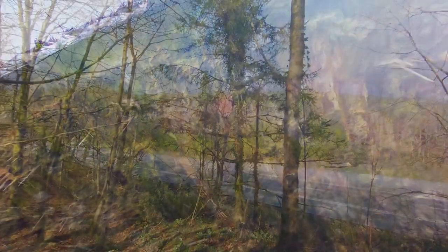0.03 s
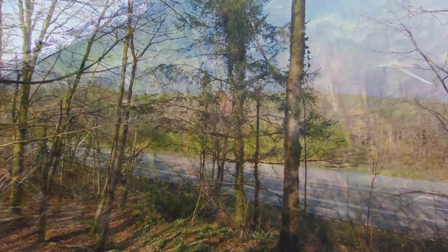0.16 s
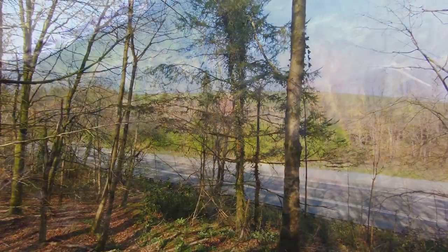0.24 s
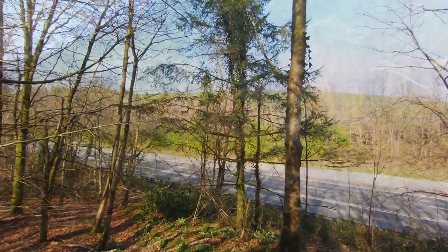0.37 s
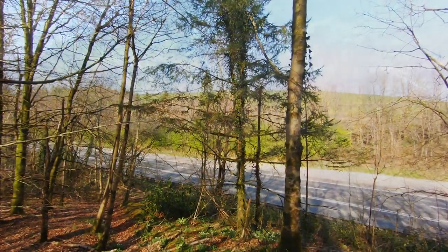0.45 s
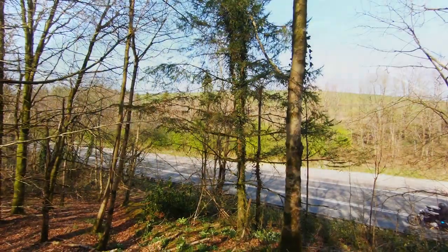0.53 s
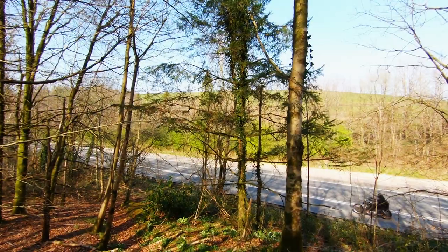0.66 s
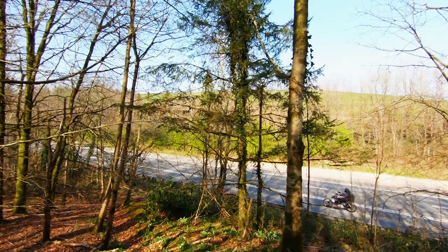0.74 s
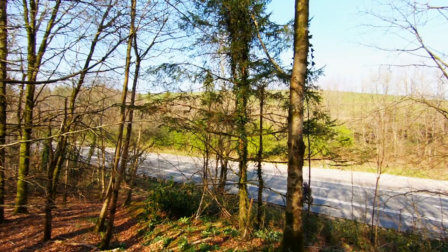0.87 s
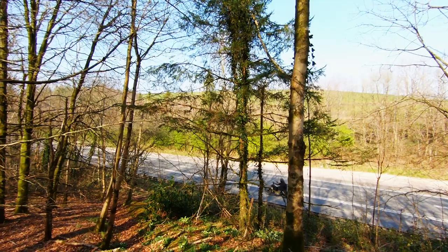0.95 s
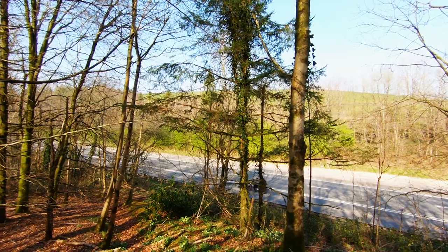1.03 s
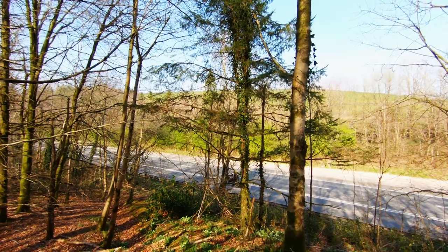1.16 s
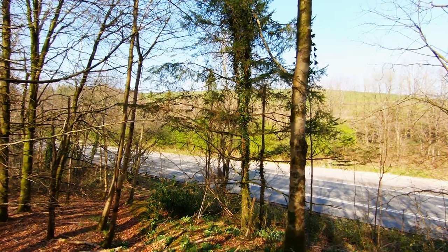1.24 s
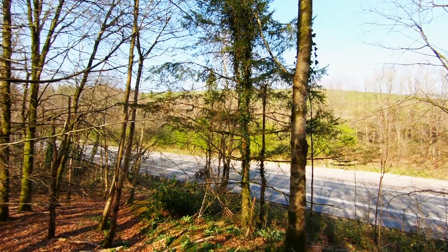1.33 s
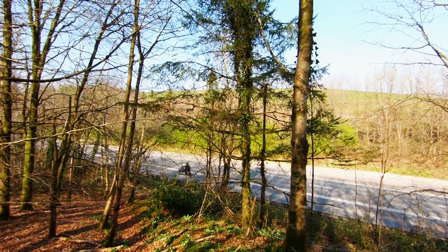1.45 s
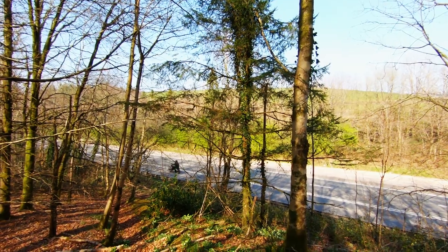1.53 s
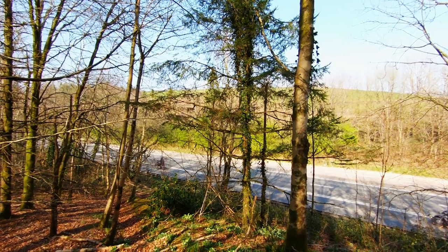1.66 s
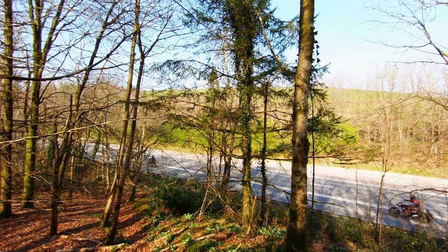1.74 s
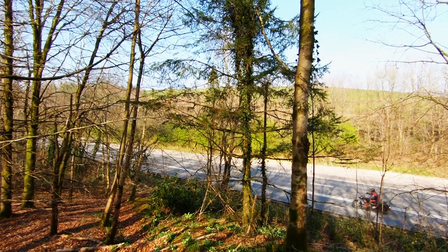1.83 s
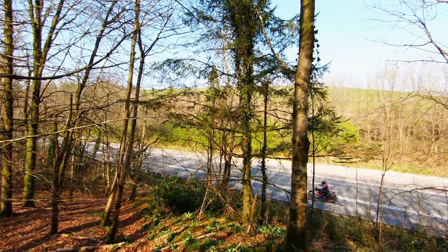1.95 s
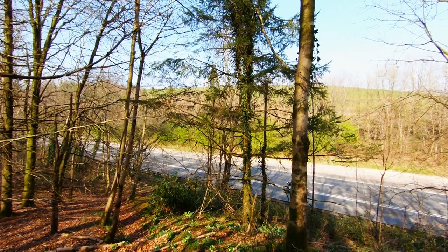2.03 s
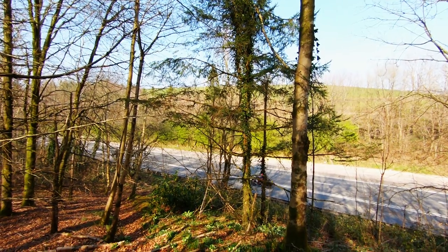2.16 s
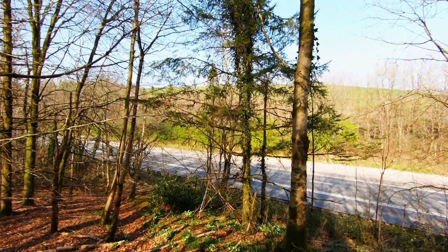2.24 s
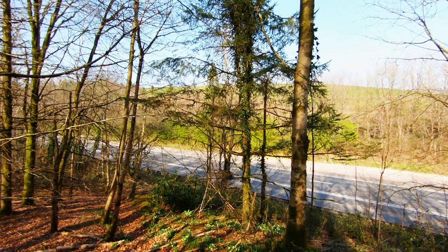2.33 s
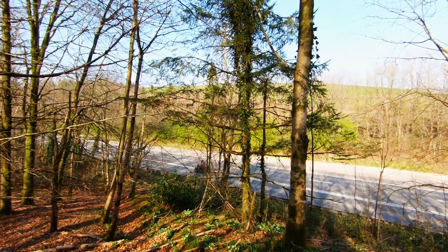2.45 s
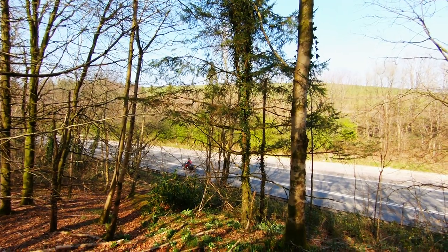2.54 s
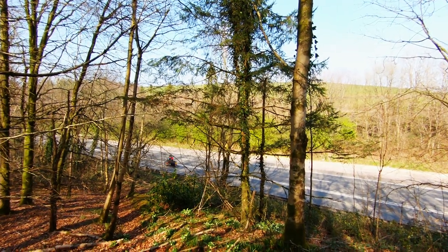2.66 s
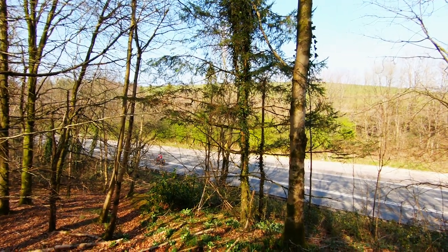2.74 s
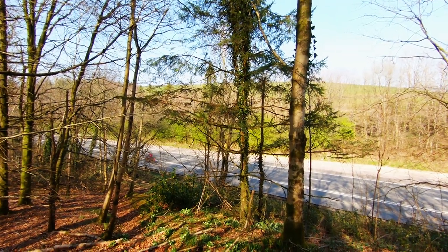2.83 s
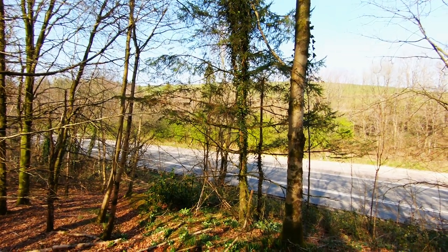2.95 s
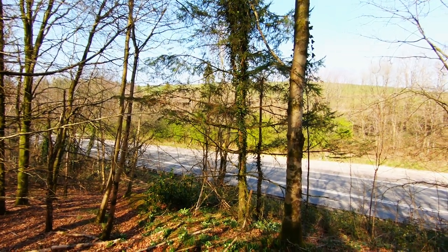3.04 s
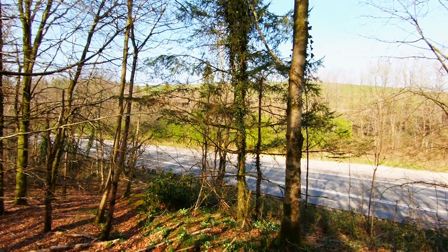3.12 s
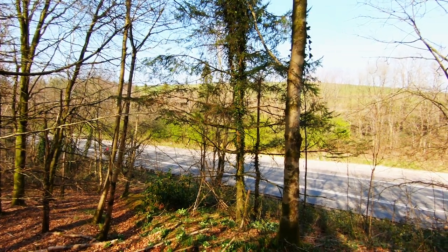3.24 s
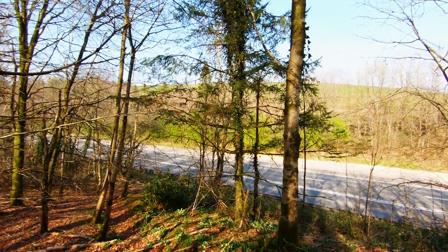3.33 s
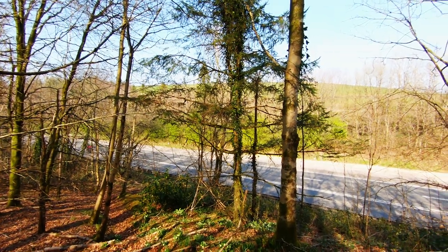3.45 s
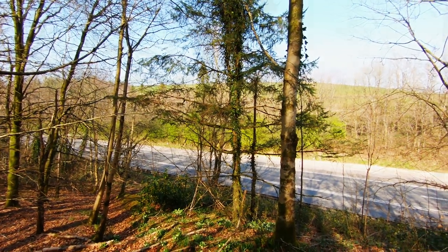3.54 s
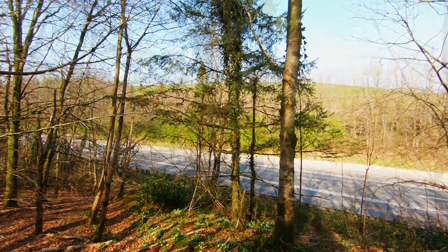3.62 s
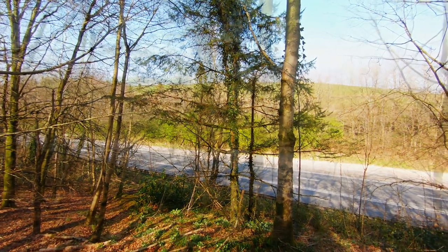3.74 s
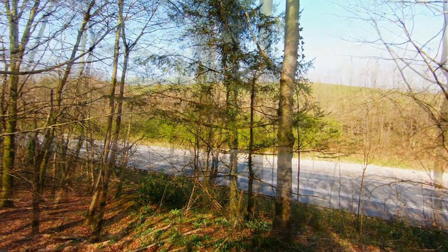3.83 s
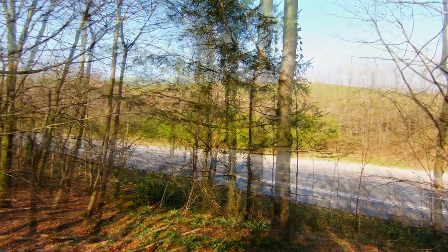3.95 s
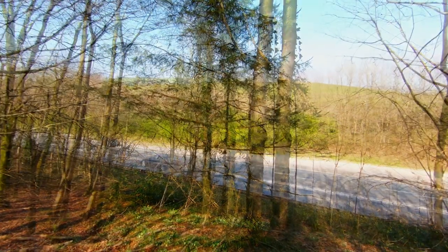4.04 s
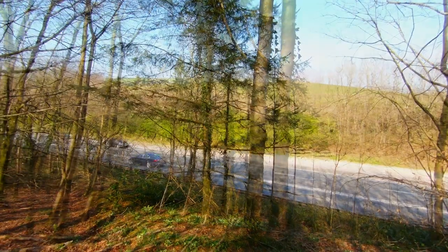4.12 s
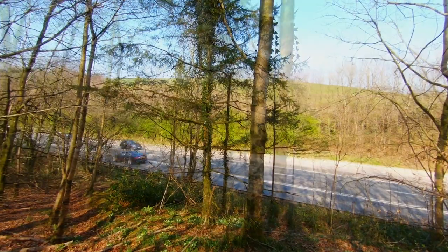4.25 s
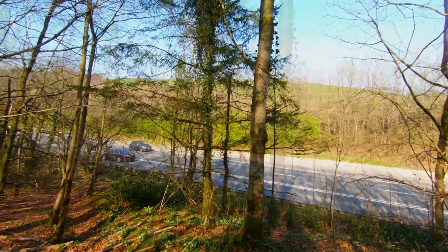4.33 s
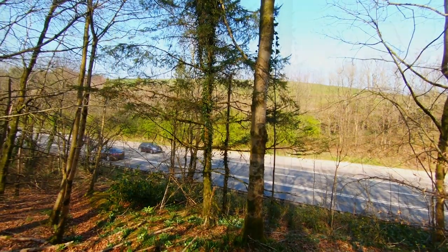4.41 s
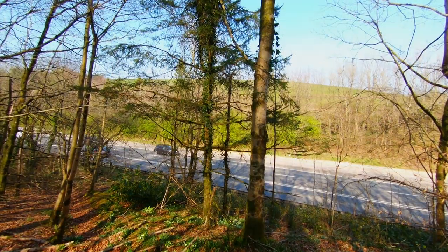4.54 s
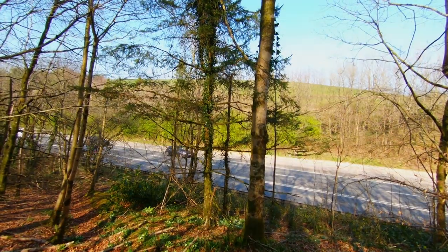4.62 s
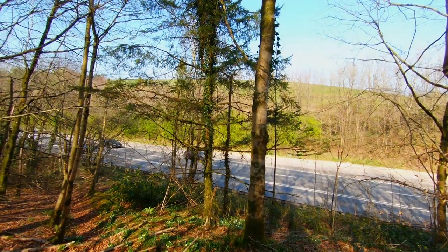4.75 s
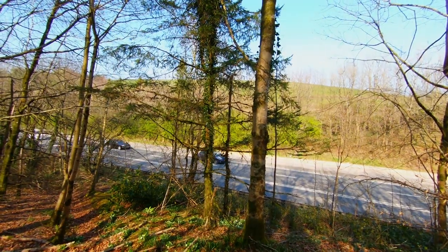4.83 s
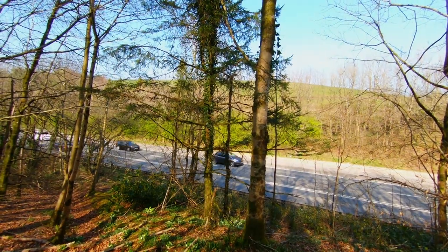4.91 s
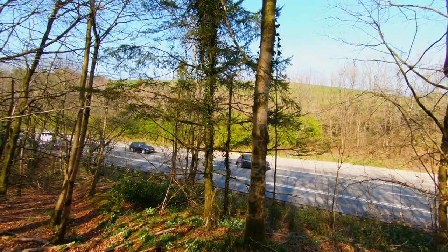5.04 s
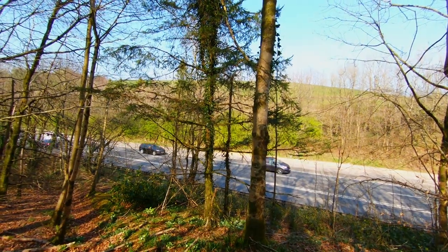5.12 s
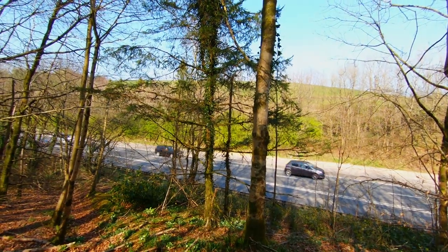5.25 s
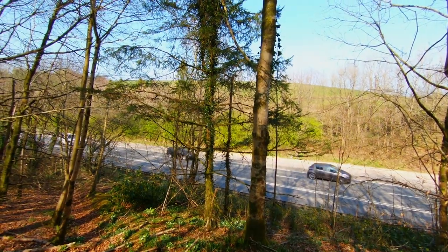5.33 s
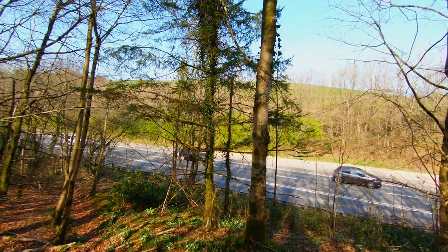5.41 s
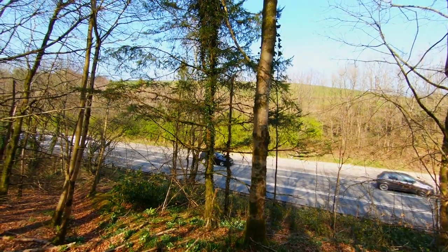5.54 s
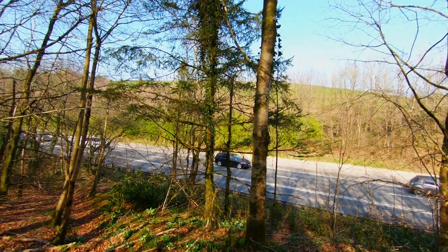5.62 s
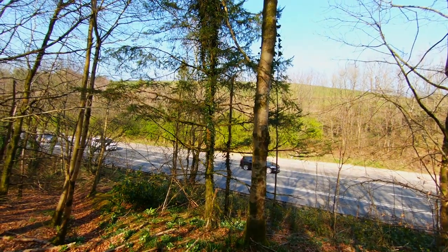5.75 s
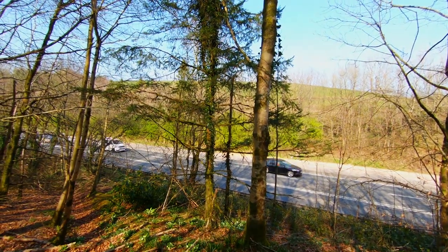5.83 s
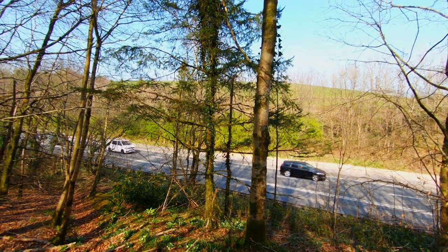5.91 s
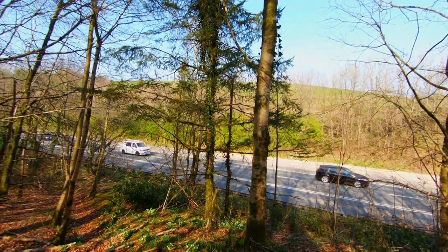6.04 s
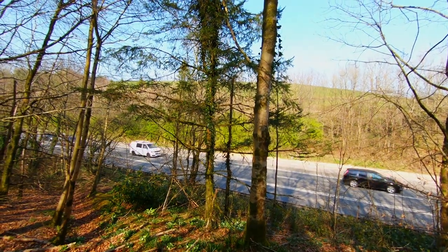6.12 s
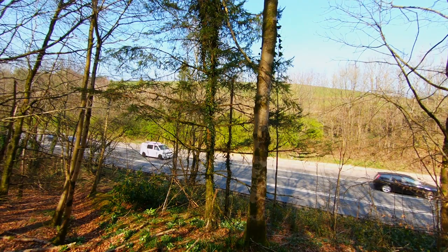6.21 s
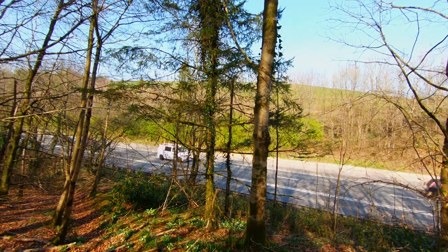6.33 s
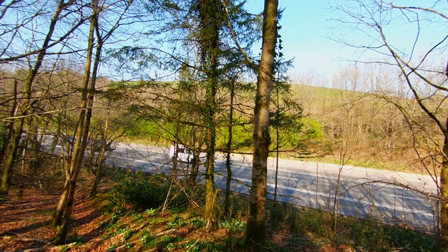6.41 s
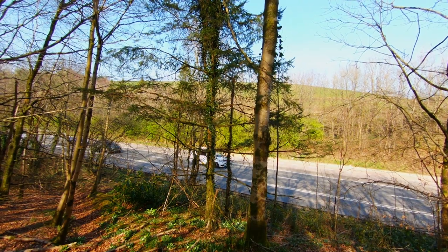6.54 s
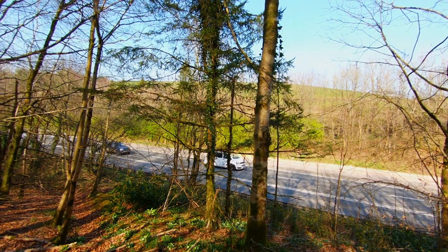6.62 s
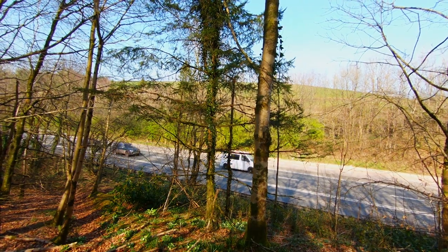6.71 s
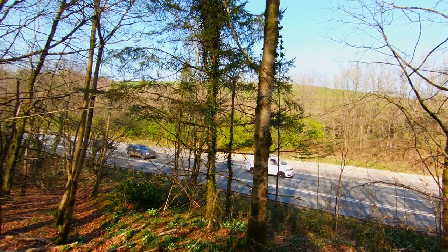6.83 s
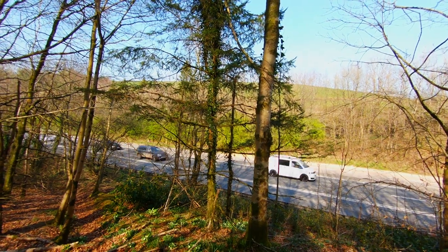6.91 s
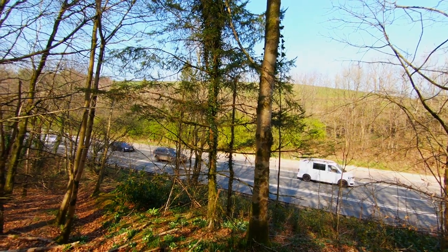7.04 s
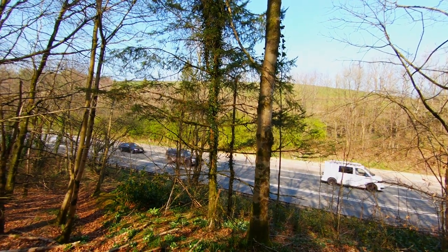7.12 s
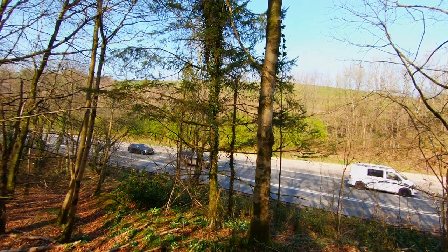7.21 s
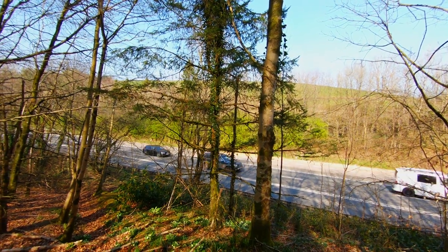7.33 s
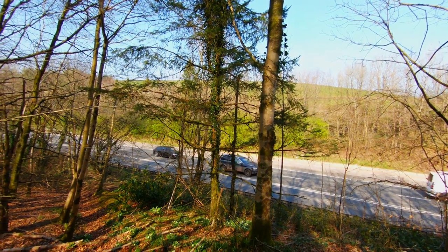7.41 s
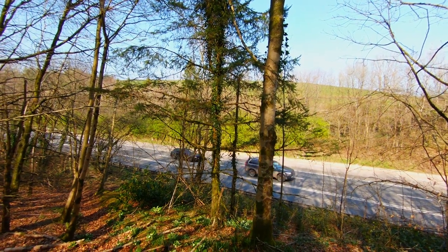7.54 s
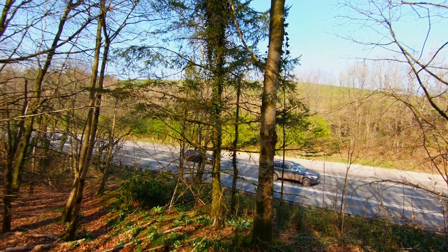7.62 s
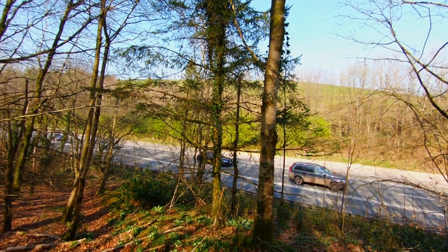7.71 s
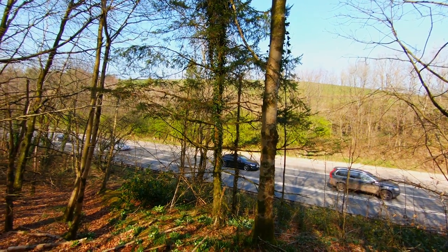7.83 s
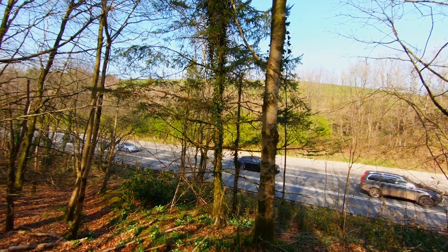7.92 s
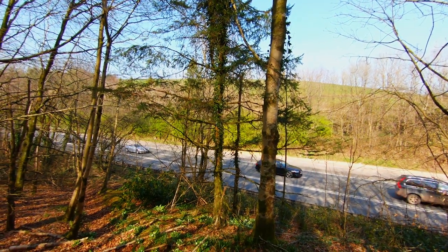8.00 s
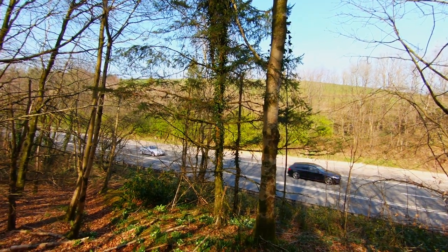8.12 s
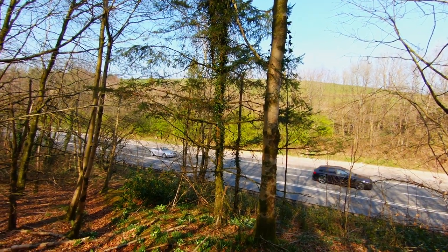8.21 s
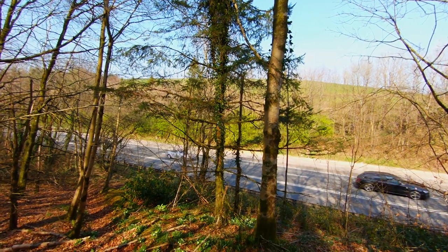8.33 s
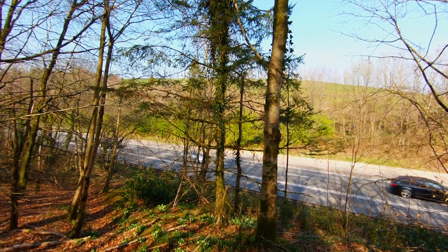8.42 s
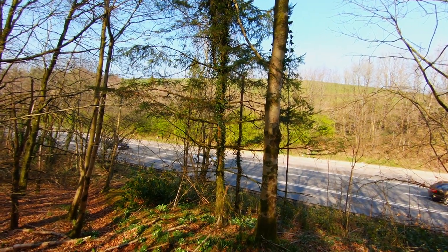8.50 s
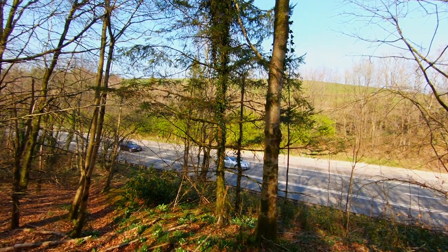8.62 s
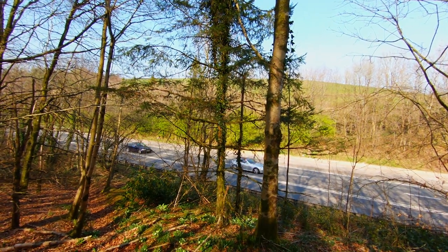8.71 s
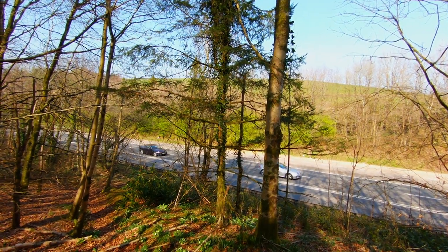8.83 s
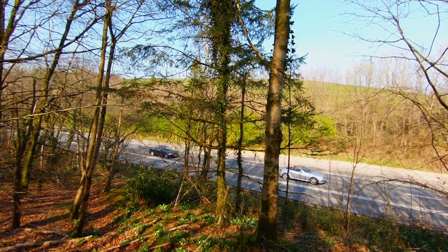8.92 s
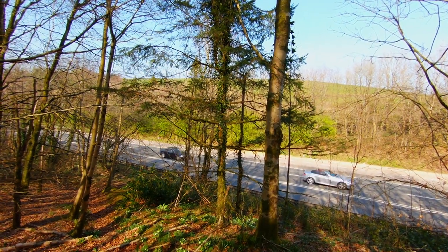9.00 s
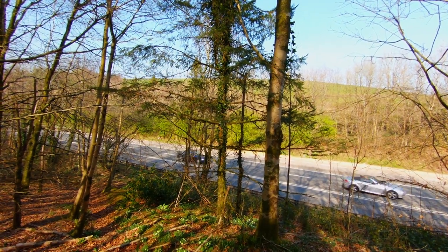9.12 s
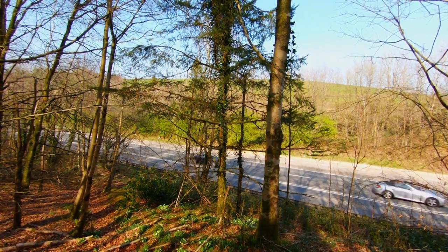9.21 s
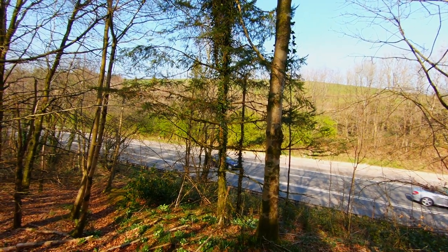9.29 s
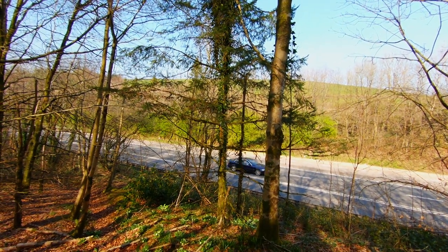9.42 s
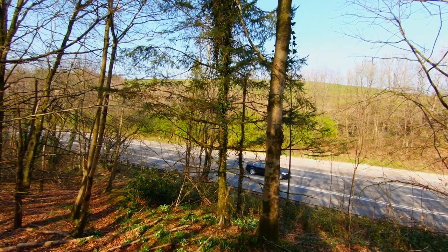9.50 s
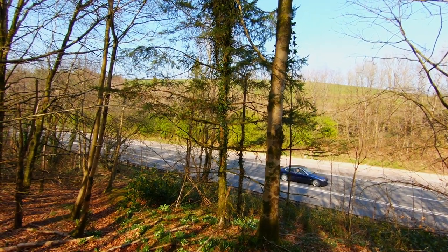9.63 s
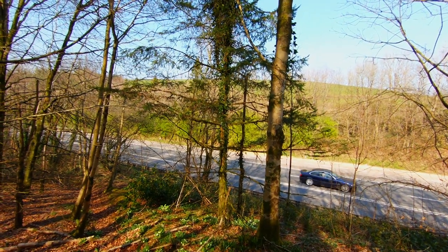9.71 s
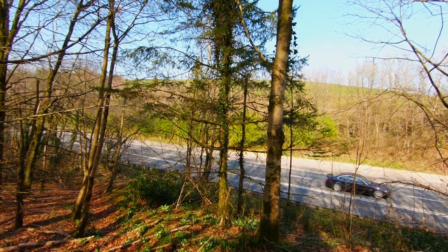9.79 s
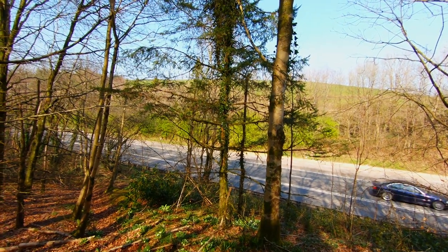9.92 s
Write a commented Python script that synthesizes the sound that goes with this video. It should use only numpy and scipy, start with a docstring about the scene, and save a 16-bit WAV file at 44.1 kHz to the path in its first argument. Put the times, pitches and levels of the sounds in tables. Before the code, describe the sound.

Heard from a wooded bank beside a main road: sound fades in on a lumpy, low motorcycle with a short bark and valve ticking, then a second, smoother and louder one passes and drops in pitch as it recedes. A faint click, then a stream of cars swells by with tyre roar, rumble and humming engines, the last hum strongest.

```python
"""Motorcycles and cars past a wooded bank

Two motorcycles pass one after the other; their exhausts, sums of overtones on a gliding firing rate, sink
and beat as they ride away, with coloured noise for intake rasp, chain and tyres. A faint click comes as they
give way to a line of cars: pitch-bent noise roars, narrow bands sing over a low rumble, and single engine
tones hum through, the last one loudest. Air hisses faintly in the trees; later there is a small dry snap."""
import sys
import numpy as np
from scipy import signal
from scipy.fft import rfft, irfft, next_fast_len
from scipy.io import wavfile
from scipy.ndimage import uniform_filter1d, map_coordinates

SR = 44100
rng = np.random.default_rng(int(sys.argv[2]) if len(sys.argv) > 2 else 0)


def wav_out(sig):
    """Save sig, one row per channel (or a flat mono array), as 16-bit PCM at SR to the path in sys.argv[1]."""
    wavfile.write(sys.argv[1], SR, np.round(np.clip(np.atleast_2d(sig).T, -1, 1) * 32767).astype(np.int16))


N = 439236
TIME = np.arange(N) / SR
TWIN_HZ = 23.554  # engine cycles per second of the first motorcycle, an uneven-firing twin


def amp(db):
    """Decibels to gain."""
    return 10 ** (np.asarray(db) / 20)


def unit(x):
    """Scale to rms 1."""
    return x / np.sqrt(np.mean(x ** 2) + 1e-20)


def curves(rows):
    """One value per sample for each column after the time."""
    s, *columns = np.transpose(rows)
    return [np.interp(TIME, s, column) for column in columns]


def ramp(start, end):
    """Rises from 0 to 1 between two times."""
    return np.clip((TIME - start) / max(end - start, 1e-3), 0, 1)


def wobble(rate):
    """A smooth random curve, rate knots a second."""
    knots = rng.standard_normal(int(N * rate / SR) + 4)
    coarse = TIME[::64]
    return np.interp(TIME, coarse, map_coordinates(knots, [coarse * rate]))


def filtered(x, response):
    """x times a response of frequency."""
    m = next_fast_len(N + SR // 2)
    return irfft(rfft(x, m) * response(np.fft.rfftfreq(m, 1 / SR)), m)[:N]


def noise(spectrum, patchy_db):
    """Noise of rms 1 with a (f/Hz, level/dB) colour and a level patchy over time and frequency."""
    z = signal.stft(rng.standard_normal(N), nperseg=1024)[2]
    field = uniform_filter1d(rng.standard_normal(z.shape), size=7, axis=0)  # smooth over frequency
    field = uniform_filter1d(field, size=10, axis=1)  # and over time
    patchy = signal.istft(z * amp(patchy_db * unit(field)), nperseg=1024)[1][:N]
    hz, db = np.transpose(spectrum)

    def colour(f):
        return amp(np.interp(np.log(f + 1), np.log(hz), db, left=-120, right=-120))

    return unit(filtered(patchy, colour))


def turning(hz):
    """Phase angle of something that turns at a changing rate."""
    return 2 * np.pi * np.cumsum(hz) / SR


def passing(closest_s, level_db, near_s):
    """Gain of vehicles going by: power falls with distance squared, to half at near_s from the closest moment."""
    coarse = TIME[::64]
    away = (coarse - np.reshape(closest_s, (-1, 1))) / near_s
    power = amp(np.reshape(level_db, (-1, 1))) ** 2 / (1 + away ** 2)
    return np.interp(TIME, coarse, np.sqrt(power.sum(axis=0)))


def swell(loudest_s, hz, peak_db, rise_s, fall_s, glide):
    """Pitch and level of a sound that glides steadily, 10 dB down at rise_s before and fall_s after its peak."""
    t = TIME - loudest_s
    away = np.maximum(-t / rise_s, t / fall_s)
    # exponent 1 = a pointed swell, 2 = a rounded one
    return hz + glide * t, peak_db - 10 * np.abs(away) ** 1.5


def narrow_band(hz, level_db, width_hz):
    """A narrow band of noise, slow noise on a carrier, whose centre follows hz."""
    def narrow(f):
        return np.exp(-(f / width_hz) ** 2)

    flutter, drift = (filtered(white, narrow) for white in rng.standard_normal((2, N)))
    angle = turning(hz)
    return amp(level_db) * unit(flutter * np.cos(angle) + drift * np.sin(angle))


def woods():
    """A faint steady hiss of air in the trees."""
    # colour of the hiss: f/Hz, relative level/dB
    air = [(400, -1.5), (1500, -3.5), (3000, -4), (4200, -9.5), (5200, -10), (6000, -28), (8000, -27),
           (11000, -55)]
    return amp(-56.0 + .8 * wobble(2.9)) * noise(air, patchy_db=1.5)


def motorcycles():
    """Two motorcycles; the twin holds its revs, so only the Doppler shift lowers its note."""
    # the second motorcycle eases off as it goes by: t/s, firing rate f/Hz
    tourer_revs = [(0, 64.87), (1.2, 64.9), (1.7, 62.91), (2.3, 59.78), (2.7, 58.31), (3, 56.13),
                   (3.25, 57.1), (3.85, 56.08)]
    shift, drop_at_s, drop_s = .0704, .75, .7378  # Doppler share, middle and time scale of its drop
    away = (TIME - drop_at_s) / drop_s
    twin_hz = TWIN_HZ * (1 - shift * away / np.hypot(1, away))
    tourer_hz, = curves(tourer_revs)
    return bike_exhausts(twin_hz, tourer_hz) + bike_noise(twin_hz, tourer_hz)


def bike_exhausts(twin_hz, tourer_hz):
    """Each exhaust swells as it goes by; echoes off the valley side put a floor under its level."""
    # twin: multiple of the cycle, then relative level/dB coming, going past, far off
    twin_orders = [(2, -2, -7, -12), (3, -10, -7, -7), (4, 3, -4, -14), (5, -.5, .5, -2), (6, 0, -18, -17),
                   (7, -4.5, -14, -30), (8, -14, -13, -14.5), (9, -9, -9.5, -24), (10, -28, -17, -16),
                   (11, -3.5, -24, -29), (12, -19, -12, -11), (13, -9, -36, -12), (14, -23, -19, -13.5)]
    # tourer: multiple of the firing rate, then relative level/dB coming, going past, leaving,
    # throttle shut, far off
    tourer_orders = [(1, -6, -6, -7, -13, -16), (2, 0, 0, 0, 0, 0), (3, -10, -11.5, -11.5, -20, -11),
                     (4, -18, -19, -24, -20, -11), (5, -26, -8.5, -18, -23, -13),
                     (6, -23, -17, -24, -31, -19), (7, -29, -21, -28, -24, -28),
                     (8, -21.5, -23, -20, -28, -25), (9, -22, -23, -22, -25, -28),
                     (10, -28, -28, -25, -25, -28), (11, -28, -24, -20, -20, -28),
                     (12, -32, -24, -22, -18.5, -22), (13, -28, -27, -21, -19, -26),
                     (14, -32, -29, -20, -23, -31), (15, -34, -34, -24, -28, -24)]
    # a brief bark: loudest t/s, firing rate f/Hz, peak level/dB, rise t/s, fall t/s, glide/(Hz/s)
    bark_swell = (.67, 63.5, -33.5, .2, .16, -3.4)
    # bark: multiple of the firing rate, then relative level/dB opening, closing
    bark_orders = [(7, -3, -5), (8, -8, -7), (9, -8, -7), (10, -5, -4), (11, -2, -1), (12, -2, 0),
                   (13, -6, -4), (14, -9, -6), (15, -9, -6), (16, -10, -6), (17, -12, -8), (18, -13, -9),
                   (19, -14, -11), (20, -14, -13)]

    twin = exhaust(twin_hz, twin_orders, stages=(.5, 1.2, 2.3), jitter=0.0099, fading_db=2.0, echo_share=0.98)
    twin *= np.hypot(passing(1.1, level_db=-26.5, near_s=0.54), amp(-28.5) * ramp(-.6, 0.85))

    tourer = exhaust(tourer_hz, tourer_orders, stages=(.8, 1.9, 2.38, 2.74, 3.15),
                     jitter=0.01, fading_db=.7, echo_share=0.74)
    tourer *= np.hypot(passing(2.0, level_db=-20.5, near_s=0.94), amp(-30.5))
    # the second rider shuts the throttle for a moment: 1.5 dB down at 2.7 s
    tourer *= amp(-1.5 * np.exp(-((TIME - 2.7) / 0.12) ** 2))

    bark_hz, bark_db = swell(*bark_swell)
    bark = amp(bark_db) * exhaust(bark_hz, bark_orders, stages=(.5, .75),
                                  jitter=0.012, fading_db=.9, echo_share=0.3)
    return (1 - ramp(3.64, 4.18)) * (twin + tourer + bark + exhaust_spit(bark_hz))


def exhaust(hz, orders, stages, jitter, fading_db, echo_share):
    """An exhaust note whose overtones change as the pipe turns toward the listener and recedes."""
    angle = turning(hz) + jitter * wobble(30)  # no two firings are quite evenly spaced
    strongest = max(orders, key=lambda row: sum(row[1:]))[0]
    note = np.zeros(N)
    for multiple, *stage_db in orders:
        colour_db = np.interp(TIME, stages, stage_db) + fading_db * wobble(6.1)
        # heard directly the firings are sharp pulses; echoes shift the weaker overtones and smear them
        scatter = echo_share * rng.uniform(-np.pi, np.pi) * (multiple != strongest)
        note += amp(colour_db) * np.sin(round(multiple) * angle + scatter)
    return np.sqrt(2) * note


def exhaust_spit(hz):
    """Every firing of the bark also spits out a puff of rough gas noise."""
    # loudest t/s, peak level/dB, rise t/s, fall t/s, shortness of each puff [no unit]
    spit_swell = (.7, -37.5, .22, .15, 2.2)
    # colour of the gas noise: f/Hz, relative level/dB
    spit_colour = [(450, -15), (800, 0), (1400, -3), (1900, -6), (2400, -6), (3000, -21)]
    loudest_s, peak_db, rise_s, fall_s, sharpness = spit_swell
    puffs = unit(np.exp(sharpness * (np.cos(turning(hz)) - 1)))
    level_db = swell(loudest_s, 0, peak_db, rise_s, fall_s, 0)[1]
    return amp(level_db) * puffs * noise(spit_colour, patchy_db=3.0)


def bike_noise(twin_hz, tourer_hz):
    """Intake rasp and chain noise pulse with the engines; the tyres hiss only close by."""
    # motorcycles going by: closest t/s, then level/dB before trims of rasp (also used for rumble), chain, hiss
    bike_passes = [(.81, -30.5, -42.5, -54.5), (1.98, -29, -56.5, -53)]
    # intake and valve noise close by: f/Hz, relative level/dB
    near_colour = [(250, -31), (400, -18), (600, -3.5), (820, -3.5), (1350, -5), (1700, -10), (2400, -16.5),
                   (3000, -19), (3800, -25)]
    # the same along the ground, through the trees: f/Hz, relative level/dB
    far_colour = [(210, -31), (350, -16), (371, -22), (402, -13.5), (550, -8), (576, -4), (787, -1),
                  (1150, -13), (1580, -12), (1810, -22), (2200, -16), (2620, -25.5), (2980, -22.5),
                  (3500, -27.5), (5560, -48), (7230, -49.5), (12200, -120)]
    # throb of the receding exhaust: depth each cycle, depth each half cycle [shares]
    far_throb = (.26, .16)
    # drive chains: f/Hz, relative level/dB
    chain_colour = [(2200, -18), (3000, -8), (3600, -1), (4400, -0.5), (5000, -4.5), (5400, -9),
                    (5800, -15), (6800, -38)]
    # gliding bands of intake rasp, chain whine and ground echoes: loudest t/s, centre f/Hz,
    # level/dB before trim, rise t/s, fall t/s, glide/(Hz/s), width f/Hz
    band_swells = [(.29, 4530, -47, .13, .2, -29, 270), (.5, 1390, -38.5, .38, .2, 0, 230),
                   (.68, 2370, -43.5, .45, .2, -200, 280), (.76, 1900, -40, .25, .12, -1200, 260),
                   (1.86, 1330, -33, .6, .33, -250, 300), (1.5, 1750, -41.5, .35, .35, -300, 220),
                   (2.3, 2230, -46, .3, .2, 0, 220), (2.75, 1400, -42, .3, .26, 0, 260),
                   (2.8, 2170, -42, .2, .4, 58, 190), (3.02, 2980, -44.5, .18, .19, -58, 220),
                   (3.3, 2415, -48, .4, .25, 0, 180)]
    # tyre hiss: f/Hz, relative level/dB
    hiss_colour = [(5300, -13), (6200, -2.5), (7700, -0.5), (8500, -5.5), (9300, -8), (10000, -13),
                   (10600, -20), (11500, -19.5), (13000, -26.5)]
    # hiss thrown toward the listener, sinking as they pass: loudest t/s, centre f/Hz, level/dB, rise t/s,
    # fall t/s, glide/(Hz/s)
    hiss_sweeps = [(.84, 8000, -60.5, .17, .3, -1500), (2.02, 7950, -60, .17, .4, -2400)]
    # low rumble: f/Hz, relative level/dB
    rumble_colour = [(12, -14), (28, -9.5), (50, 6), (110, -1), (200, -9), (330, -7), (480, -15),
                     (900, -50.5)]

    closest_s, rasp_db, chain_db, hiss_db = np.transpose(bike_passes)
    far = ramp(1.6, 2.52)  # crossfade from the close rasp to the far one
    close_rasp = passing(closest_s, rasp_db, near_s=0.51) * np.sqrt(1 - far)
    close_rasp *= over_road(noise(near_colour, patchy_db=0.5), closest_s[1])
    far_rasp = passing(closest_s, rasp_db, near_s=1.32) * np.sqrt(far) * noise(far_colour, patchy_db=1.45)
    rasp = amp(-1.6) * close_rasp * throbbing(tourer_hz, cycle_depth=0.079, half_cycle_depth=0.15)
    rasp += amp(-2.0) * far_rasp * throbbing(tourer_hz, *far_throb)

    # muffled until they come into view, and at once when they leave it
    behind_trees = amp(-4.5 * (1 - ramp(0.43, 0.67)) - 4.4 * ramp(3.13, 3.131))
    chain = amp(-2.0) * passing(closest_s + 0.084, chain_db, near_s=0.75) * behind_trees
    chain *= noise(chain_colour, patchy_db=2.0)
    bands = amp(-1.0) * sum(narrow_band(*swell(*row), width_hz=width) for *row, width in band_swells)
    pulsing = (chain + bands) * throbbing(twin_hz, cycle_depth=0.072, half_cycle_depth=0.096)
    ticking = valve_ticks(twin_hz)

    hiss = amp(-4.0 + .6 * wobble(14)) * passing(closest_s, hiss_db, near_s=0.24)
    hiss *= noise(hiss_colour, patchy_db=1.4)
    hiss += sum(narrow_band(*swell(*row), width_hz=750) for row in hiss_sweeps)
    hiss *= throbbing(tourer_hz, cycle_depth=0.08, half_cycle_depth=0.14)

    rumble = amp(-2.0 + 0.76 * wobble(6.8)) * passing(closest_s, rasp_db, near_s=3.0)
    rumble *= noise(rumble_colour, patchy_db=0.5)
    return (1 - ramp(3.33, 4.63)) * (rasp + pulsing + ticking + hiss + rumble)


def over_road(sound, closest_s):
    """The road mirrors a passing source; the echo's lag peaks as it goes by, so bands sweep down and up again."""
    longest_lag_s, near_s, echo_share = .0026, .8, .3
    lag_s = longest_lag_s / np.hypot(1, (TIME - closest_s) / near_s)
    return unit(sound + echo_share * np.interp(TIME - lag_s, TIME, sound))


def throbbing(hz, cycle_depth, half_cycle_depth):
    """Noise swells once and twice in every turn of the given rate."""
    angle = turning(hz)
    return unit(1 + cycle_depth * np.cos(angle) + half_cycle_depth * np.cos(2 * angle))


def valve_ticks(hz):
    """Twice a cycle the twin's valves tick, unevenly strong; the ring of its fins falls with the Doppler shift."""
    # ticks: loudest t/s, peak level/dB before scatter, rise t/s, fall t/s
    valve_swell = (.94, -37.3, .13, .47)
    # colour of the ticks: f/Hz, relative level/dB
    valve_colour = [(1800, -16), (3000, -5), (3950, -1), (4600, -5), (5300, -11), (6000, -19), (8000, -19),
                    (11000, -43)]
    # cylinder fins ringing along: f/Hz mid-drop, peak level/dB, loudest t/s, rise t/s, fall t/s
    fin_ring = (4229.5, -49.5, 1, 0.7, 0.6)
    sharpness, scatter_db = 12, 2.2  # how short each tick is, how much their strengths differ
    loudest_s, peak_db, rise_s, fall_s = valve_swell
    level_db = swell(loudest_s, 0, peak_db, rise_s, fall_s, 0)[1] + scatter_db * wobble(56)
    ticks = np.exp(sharpness * (np.cos(2 * turning(hz)) - 1))
    ring_hz, ring_peak_db, ring_s, ring_rise_s, ring_fall_s = fin_ring
    ring_db = swell(ring_s, 0, ring_peak_db, ring_rise_s, ring_fall_s, 0)[1]
    ring = narrow_band(ring_hz * hz / TWIN_HZ, ring_db, width_hz=240)
    return amp(level_db) * ticks * noise(valve_colour, patchy_db=2.0) + ring * unit(0.31 + ticks)


def tyres():
    """The line of cars: body rumble, carcass drone, tyre roar, tread patter and air squeezed from the grooves."""
    # cars going by: closest t/s, then level/dB of rumble, roar (the drone follows it), tread, rush, hiss,
    # then tyre pitch [ratio]
    car_passes = [(4.45, -26, -26, -33.5, -40.5, -72.5, 1), (5.5, -23.5, -26, -33.5, -42, -65, 1),
                  (6.3, -29, -23, -30.5, -42.5, -66.5, 1.02), (7.2, -23.5, -25, -37, -46, -68.5, 1),
                  (7.95, -27, -26.5, -34.5, -45, -68, 1), (8.35, -31, -27.5, -35, -46, -70, 1),
                  (9.2, -24.5, -24, -30.5, -42, -68.5, 1.01), (10.1, -31.5, -38.5, -37.5, -53.5, -69, 1)]
    # body rumble: f/Hz, relative level/dB
    rumble_colour = [(12, -28.5), (27, -19.5), (50, -10.5), (65, -3), (85, 0), (120, 0), (150, -6),
                     (185, -12.5), (260, -35)]
    # tyre carcass: f/Hz, relative level/dB
    drone_colour = [(130, -20.5), (170, 0), (260, 0.5), (300, -3.5), (400, -6.5), (480, -8.5), (620, -22)]
    # the horn between tyre and road: f/Hz, relative level/dB
    roar_colour = [(400, -19.5), (500, -15), (620, -4.5), (760, 1), (900, -2), (1050, -12), (1300, -28.5)]
    # tread blocks striking: f/Hz, relative level/dB
    tread_colour = [(580, -29), (980, -4), (1040, -3.5), (1270, -1.5), (1590, -13.5), (1700, -20),
                    (2210, -51), (3740, -120)]
    # air pumped from the grooves: f/Hz, relative level/dB
    rush_colour = [(940, -30.5), (1600, -5), (1890, -2.5), (2420, -9.5), (2630, -10.5), (3150, -14),
                   (3680, -17), (5200, -27), (5560, -32.5), (7230, -52), (12200, -120)]
    # tyre hiss: f/Hz, relative level/dB
    hiss_colour = [(5300, -9), (6200, -1), (7200, 0), (7900, -2), (8500, -5), (9300, -9), (10000, -18),
                   (10700, -31), (13000, -40)]

    closest_s, rumble_db, roar_db, tread_db, rush_db, hiss_db, pitch = np.transpose(car_passes)
    rumble = passing(closest_s, rumble_db, near_s=0.64) * noise(rumble_colour, patchy_db=1.0)
    drone = amp(-7) * passing(closest_s, roar_db, near_s=1.35) * noise(drone_colour, patchy_db=1.0)
    roar = driving_by(noise(roar_colour, patchy_db=1.0), closest_s, roar_db, pitch, near_s=0.71)
    roar *= amp(0.3 * wobble(9))
    tread = driving_by(noise(tread_colour, patchy_db=0.6), closest_s, tread_db, pitch, near_s=0.55)
    rush = passing(closest_s, rush_db, near_s=0.8) * noise(rush_colour, patchy_db=0.87)
    hiss = passing(closest_s, hiss_db, near_s=.35) * noise(hiss_colour, patchy_db=1.5)
    # the cars fade in, the low roar ahead of the treble
    low = ramp(3.57, 4.34) * (rumble + drone + roar)
    return low + ramp(3.77, 4.48) * (tread + rush) + ramp(3.95, 4.4) * hiss


def driving_by(sound, closest_s, level_db, pitch, near_s):
    """Each car plays the tyre sound at its own pitch, which sinks as it swells and goes by."""
    doppler = .035  # shift of a car far off, as a share
    total = np.zeros(N)
    for s, db, own in zip(closest_s, level_db, pitch):
        away = (TIME - s) / near_s
        speed = own * (1 - doppler * away / np.hypot(1, away))
        position = np.cumsum(speed) + rng.uniform(0, N)
        total += passing(s, db, near_s) * np.interp(position % N, np.arange(N), sound)
    return filtered(total, lambda hz: 1 / (1 + (hz / 2500) ** 8))


def engines():
    """Car engines that stand out, and the loudest one, nearing toward the end."""
    # loudest t/s, firing rate f/Hz, peak level/dB before trim, rise t/s, fall t/s, glide/(Hz/s)
    engine_swells = [(4.95, 134, -26.5, 0.74, 0.67, -1), (5.55, 129.5, -26.5, 0.46, 0.65, -11),
                     (6.5, 65, -31.5, 0.54, 0.18, -0.5), (6.9, 88, -28.5, 0.22, 1.1, -9),
                     (5.8, 68, -26, .45, 0.33, 1), (7.9, 76.5, -26, 0.89, 0.68, -11),
                     (6.752, 228.3, -29, 0.27, 0.83, -9), (8.297, 147, -30.5, 0.44, 1.3, -0.5),
                     (9.293, 107.7, -29.5, 0.38, 1.6, 1.5), (9.549, 346, -34.5, 0.24, 0.31, -19.5)]
    # the loudest engine: t/s, firing rate f/Hz, level/dB
    nearing_engine = [(6.2, 203, -51), (7.7, 205.2, -30), (8.1, 209.5, -25.5), (8.3, 212.6, -30.5),
                      (8.5, 207.8, -22), (8.65, 207.6, -29), (9, 209.9, -28.5), (9.35, 207.9, -19),
                      (9.55, 207, -18.5), (9.67, 204, -13.5), (9.85, 205.3, -16), (9.96, 202.3, -17)]
    hums = sum(engine_hum(*swell(*row), waver=0.23, fading_db=2.0, octave_db=-30.5) for row in engine_swells)
    nearing = engine_hum(*curves(nearing_engine), waver=0.045, fading_db=.9, octave_db=-32)
    return amp(-1.0) * hums + nearing


def engine_hum(hz, level_db, waver, fading_db, octave_db):
    """A muffled engine: almost only its firing tone gets through the trees."""
    angle = turning(hz) + waver * wobble(14)
    tone = np.sin(angle) + amp(octave_db) * np.sin(2 * angle)
    return amp(level_db + fading_db * wobble(10)) * unit(tone)


def singing_tyres():
    """Unevenly spaced tread blocks sing in narrow bands that glide as the cars move."""
    # loudest t/s, centre f/Hz, peak level/dB before trim, rise t/s, fall t/s, glide/(Hz/s)
    song_swells = [(4.75, 1865, -40.5, 0.56, 0.49, 41.5), (5.45, 1990, -40, .5, 0.33, 330),
                   (4.6, 2655, -49, .4, 0.59, 20.5), (4.7, 4460, -59, .5, .8, 0),
                   (4.95, 530, -34, 0.55, .7, 0), (4.5, 1282, -30.5, 0.68, 0.67, 9.5),
                   (6.35, 1085, -27, 1, 0.58, -1.5), (7.6, 860, -24, 1.4, 1.2, 0.5),
                   (9.34, 870, -26, 0.53, .65, -0.5)]
    return amp(-1.0) * sum(narrow_band(*swell(*row), width_hz=154) for row in song_swells)


def clicks():
    """A faint click as the motorcycles give way to the cars, then a small dry snap: decaying noise bursts."""
    # the click, then the snap: t/s, level/dB
    click_times = [(3.79, -52.5), (7.242, -44.5)]
    # colour of both: f/Hz, relative level/dB
    click_colour = [(2500, -13), (4000, 0), (5500, -9), (8200, -9), (10500, -31)]
    t60_s = .014  # time to fall 60 dB
    bursts = sum((TIME >= s) * amp(db - 60 * np.abs(TIME - s) / t60_s) for s, db in click_times)
    return bursts * noise(click_colour, patchy_db=0.5)


def scene():
    """Motorcycles first, then the cars."""
    # the motorcycles and the woods fade in: start t/s, end t/s
    fade_in = (-0.28, 0.66)
    opening = ramp(*fade_in) * (motorcycles() + woods())
    cars = tyres() + ramp(3.68, 4.02) * (engines() + singing_tyres())
    return (opening + cars + clicks())[None]


def record(dry):
    """Nothing is kept above the band limit of 13.4 kHz."""
    return filtered(dry[0], lambda hz: hz < 13400)[None]


dry = scene()
out = record(dry)
wav_out(out)
```